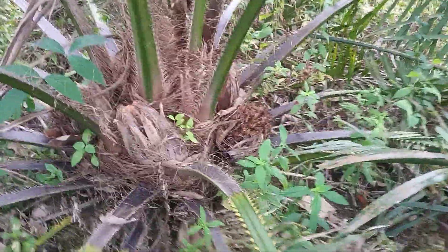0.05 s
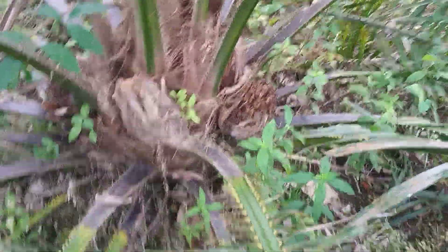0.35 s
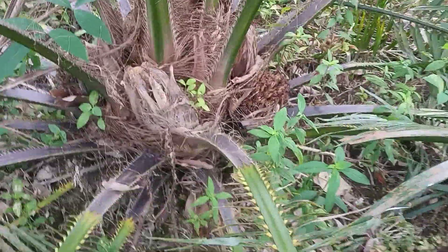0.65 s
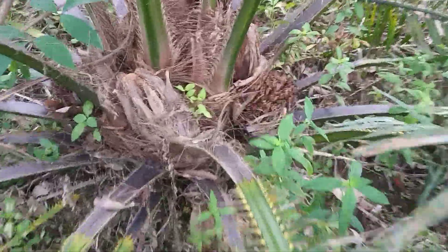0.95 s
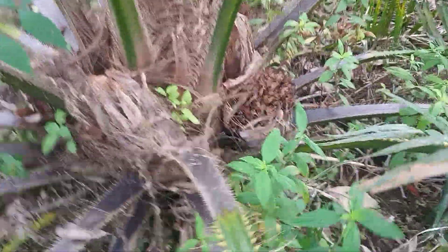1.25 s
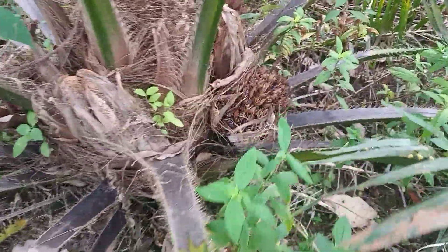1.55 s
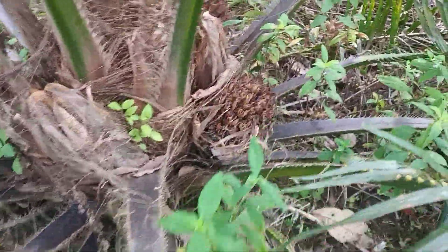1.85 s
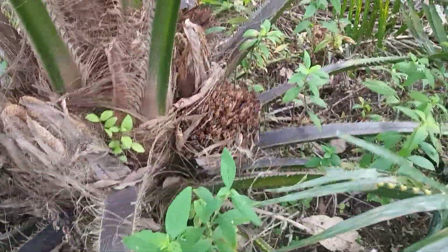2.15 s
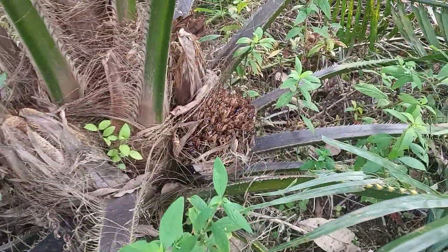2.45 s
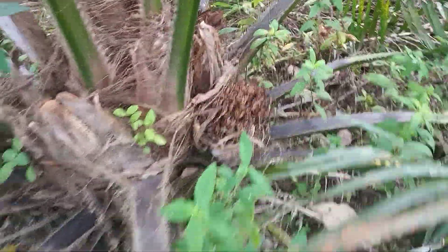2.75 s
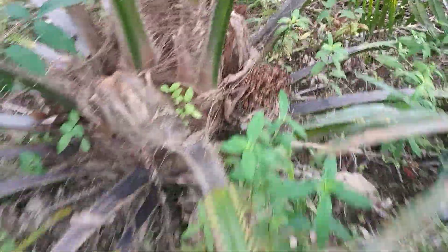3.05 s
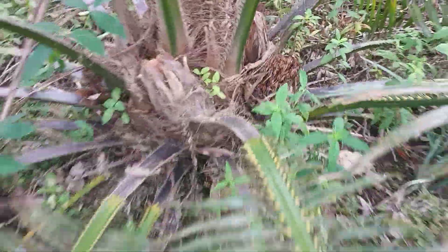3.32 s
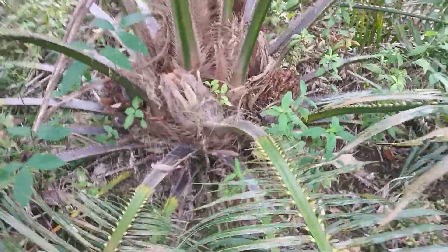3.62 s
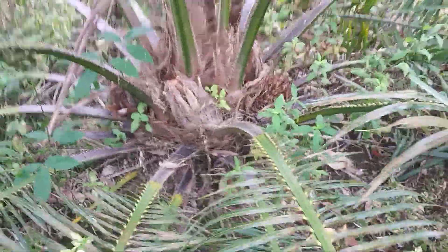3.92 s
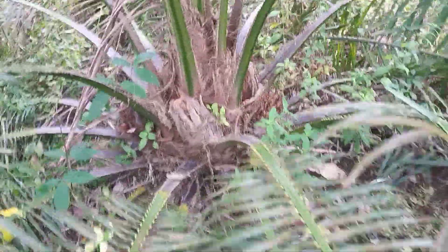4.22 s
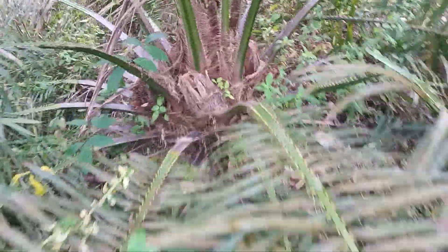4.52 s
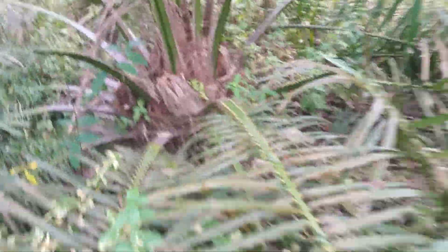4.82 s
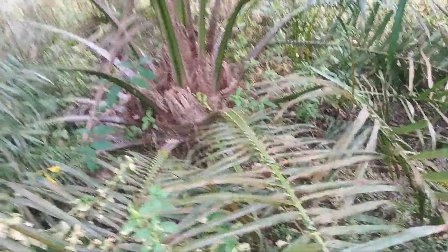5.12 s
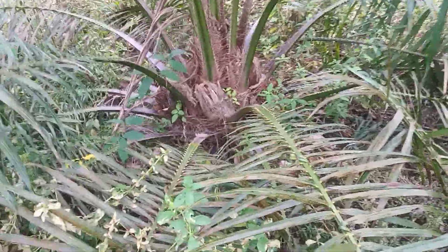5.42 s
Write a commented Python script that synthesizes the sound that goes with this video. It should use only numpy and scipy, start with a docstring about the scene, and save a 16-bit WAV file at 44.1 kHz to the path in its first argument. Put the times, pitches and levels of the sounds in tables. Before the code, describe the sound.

A steady, high insect hiss and a thin chirping cricket surround a person moving through palm undergrowth. Close by, a footstep crushes dry litter with a cluster of snapping twigs, followed by on-and-off rustling of fronds and a second, lighter step. The loudest sounds are a few sharp clicks of leaves hitting the microphone. Near the end a faint hum sets in and something hollow is knocked three times far off.

```python
"""Dead fronds crunch and snap and leaves brush past as someone steps through dry undergrowth among palms.
Stiff leaflet tips flick the camera's case, which makes its limiter duck.
Insects hiss and trill all around, and a cricket chirps with paired wing strokes.
Late on, a low drone sets in and something hollow is knocked three times further off."""
import sys
import numpy as np
from scipy import signal
from scipy.fft import rfft, irfft, next_fast_len
from scipy.io import wavfile
from scipy.ndimage import uniform_filter1d, minimum_filter1d, map_coordinates

SR = 44100
rng = np.random.default_rng(int(sys.argv[2]) if len(sys.argv) > 2 else 0)


def store_wav(level_fs):
    """Save 16-bit WAV to argv[1]."""
    pcm = np.round(np.clip(np.atleast_2d(level_fs), -1, 1) * 32767)
    wavfile.write(sys.argv[1], SR, pcm.T.astype(np.int16))


N = 250047
TIME_S = np.arange(N) / SR


def amp(db):
    """Decibels to gain."""
    return 10 ** (np.asarray(db) / 20)


def unit(x):
    """Scale to rms 1."""
    return x / np.sqrt(np.mean(x ** 2) + 1e-20)


def wobble(rate_hz):
    """Smooth random curve, rate_hz knots a second."""
    return map_coordinates(rng.standard_normal(int(N * rate_hz / SR) + 4), [TIME_S * rate_hz])


def filtered(x, response):
    """Apply a gain given as a function of frequency."""
    size = next_fast_len(len(x) + 4096)
    return irfft(rfft(x, size) * response(np.fft.rfftfreq(size, 1 / SR) + 1), size)[:len(x)]


def coloured(x, spectrum):
    """Shape x by (f/Hz, level/dB) points; rms 1."""
    f, db = np.transpose(spectrum)
    return unit(filtered(x, lambda hz: amp(np.interp(np.log(hz), np.log(f), db))))


def band(count, hz, octaves):
    """Noise in a bell around hz; rms 1."""
    noise = rng.standard_normal(count)
    return unit(filtered(noise, lambda f: np.exp(-.5 * (np.log2(f / hz) / octaves) ** 2)))


def add(track, start_s, sound):
    """Mix a sound into the track."""
    i = max(round(start_s * SR), 0)
    track[i:i + len(sound)] += sound[:max(N - i, 0)]


def resonant(x, depth_db, spacing_hz=170):
    """Impose the random resonances of one leaf or stem; rms 1."""
    heights = rng.standard_normal(1024)
    return unit(filtered(x, lambda hz: amp(depth_db * map_coordinates(heights, [hz / spacing_hz]))))


def patchy(x, depth_db, size):
    """Brief random emphases as leaf after leaf takes the lead; a larger size rings longer, narrower."""
    spectra = signal.stft(x, nperseg=size)[2]
    field = uniform_filter1d(rng.standard_normal(spectra.shape), size=4, axis=0)
    field = uniform_filter1d(field, size=6, axis=1)
    return signal.istft(spectra * amp(depth_db * unit(field)), nperseg=size)[1][:N]


def crackle(per_s, hz, cycles, spread_db, size=256):
    """Tiny fractures, each a damped ring of its own pitch and strength."""
    shape = (int(per_s * N / SR), 1)
    onsets = rng.integers(0, N, shape)
    pitch_hz = np.minimum(hz * np.exp(.5 * rng.standard_normal(shape)), SR / 2)
    strength = amp(spread_db * np.minimum(rng.exponential(size=shape), 4)) * rng.choice([-1, 1], shape)
    turns = pitch_hz * np.arange(size) / SR
    grains = strength * np.sin(2 * np.pi * turns) * np.exp(-turns / cycles)
    return unit(np.bincount((onsets + np.arange(size)).ravel(), grains.ravel(), N)[:N])


# Outdoor air: f/Hz, relative density/dB
AIR_SPECTRUM = [(20, -7), (45, 5), (75, 3), (150, -6), (350, -17), (2000, -26.5), (15000, -29.5)]


def air():
    """Faint, steady outdoor noise, mostly bass."""
    return amp(-79.5) * coloured(rng.standard_normal(N), AIR_SPECTRUM)


def drone(start_s=3.88, hz=55.8, rise_db_per_s=3.5, waver_db=1.5):
    """A low, wavering tone and rumble that set in late and slowly grow."""
    age_s = TIME_S - start_s
    gain = np.clip(age_s / 0.067, 0, 1) * amp(-52 + rise_db_per_s * age_s + waver_db * wobble(12))
    tone = np.sin(2 * np.pi * np.cumsum(hz + 1.71 * wobble(11)) / SR)
    return gain * (tone + 0.21 * band(N, 49.4, 0.58))


# Insect chorus: f/Hz, relative density/dB
CHORUS_SPECTRUM = [(2000, -45), (2650, -32), (3100, -29), (3600, -20.5), (4100, -34.5), (4600, -8),
                   (5900, -4.5), (6900, 1), (7600, -3.5), (8150, 2.5), (8650, -21.5), (10000, -27),
                   (11300, -14.5), (12200, -38), (15500, -36), (17000, -55)]
# Nearer insects: start/s, end/s, f/Hz, level/dB, pulse rate/Hz
TRILLS = [(-.2, 0.92, 4700, -66.5, 28), (-.2, 1.44, 6070, -65, 31), (1.8, 3.4, 5530, -64.5, 42),
          (4.68, 4.92, 4770, -62, 25.5)]


def insects():
    """A massed high hiss; nearer singers come and go as narrow pulsing bands."""
    flutter_db = 0.17 * wobble(2.6) + 1.4 * wobble(90)
    out = amp(-54.5 + flutter_db) * coloured(rng.standard_normal(N), CHORUS_SPECTRUM)
    for start_s, end_s, hz, db, pulse_hz in TRILLS:
        bout = np.clip(np.minimum(TIME_S - start_s, end_s - TIME_S) / 0.037, 0, 1)
        pulses = 1 + .55 * np.sin(2 * np.pi * pulse_hz * TIME_S + 1.3 * wobble(9))
        out += amp(db) * bout * unit(band(N, hz, 110 / hz) * pulses)
    return out


# Runs of double chirps: start/s, end/s, period/s, level/dB
CRICKET_RUNS = [(0.113, .8, 0.19, -50.5), (1.345, 2.42, 0.19, -54), (2.504, 2.88, 0.14, -55),
                (2.937, 4.4, 0.2, -52.5)]


def cricket(stroke_s=.042, jitter_s=.012):
    """Two wing strokes a chirp; the pitch arches with wing speed."""
    out, u = np.zeros(N), np.linspace(0, 1, int(stroke_s * SR))
    speed = np.sin(np.pi * u)
    for start_s, end_s, period_s, db in CRICKET_RUNS:
        for beat_s in np.arange(start_s, end_s, period_s):
            at_s = beat_s + rng.normal(0, jitter_s)
            for stroke in range(2):
                hz = 8120 + 190 * speed - 70 * u + rng.normal(0, 25) + 70 * band(len(u), 150, 0.96)
                tone = np.sin(2 * np.pi * np.cumsum(hz) / SR)
                add(out, at_s + stroke * stroke_s, amp(db + rng.normal(0, 1)) * speed * tone)
    return out


# Blows: t/s, relative level/dB
KNOCK_HITS = [(4.948, -34), (5.019, -31), (5.182, -33)]
# Hollow body: f/Hz, relative level/dB, t60/s
HOLLOW_MODES = [(680, -9.5, .23), (947, -6, .094), (1270, -3, .12), (2290, -10, 0.075)]


def knocks(gain_db=-13.5):
    """Blows on something hollow further off, smeared by the trees."""
    out, t = np.zeros(N), np.arange(SR // 3) / SR
    attack = 1 - np.exp(-t / 0.0012)
    for at_s, db in KNOCK_HITS:
        for hz, mode_db, t60_s in HOLLOW_MODES:
            ring = np.sin(2 * np.pi * hz * rng.normal(1, 0.016) * t) + 0.49 * band(len(t), hz, 0.32)
            add(out, at_s, amp(gain_db + db + mode_db - 60 * t / t60_s) * ring * attack)
    return out


# Single-leaf scuffs: t/s, level/dB, f/Hz, length/s
LEAF_SCUFFS = [(0.301, -65.5, 1520, 0.064), (0.582, -52, 1030, 0.086), (1.292, -58, 1200, 0.079),
               (1.351, -60.5, 1020, 0.09), (1.565, -54.5, 1170, 0.061), (1.744, -57.5, 10000, .03),
               (1.861, -68, 1410, .045), (1.979, -59.5, 1300, 0.05), (2.195, -74.5, 1190, 0.028),
               (3.174, -64.5, 1927, 0.078), (3.341, -66, 1090, 0.053), (3.964, -49, 5440, 0.11),
               (3.999, -63.5, 654, .14), (4.388, -53.5, 4000, 0.13), (4.455, -51, 11600, .025),
               (4.516, -56, 994, 0.062), (4.814, -68.5, 427, 0.07), (5.47, -63, 10000, .055)]


def brushes(peak_share=0.15):
    """A leaf catches quickly, scrapes along and slides off."""
    out, t = np.zeros(N), np.arange(SR // 4) / SR
    for at_s, db, hz, length_s in LEAF_SCUFFS:
        u = t / (peak_share * length_s)
        friction = band(len(t), hz, octaves=0.84) * amp(2 * band(len(t), 150, 1))
        add(out, at_s, amp(db) * u * np.exp(1 - u) * resonant(friction, depth_db=5.5))
    return out


# Damp rings: footfall thumps, knocked twigs and stalks, and the ring of the tip flick at 2.77 s: t/s, level/dB,
# f/Hz
DAMP_RINGS = [(.5684, -22.5, 480), (.7893, -19, 520), (.955, -28.5, 1360), (1.0398, -29, 1200),
              (1.693, -40, 1270), (1.9738, -24, 1800), (2.768, -20, 1100), (2.7715, -11.5, 622),
              (3.686, -27.5, 584), (5.147, -33, 390)]


def damp_rings(t60_at_1khz_s=0.0097):
    """Damp rings last a few cycles, with one weaker overtone."""
    out, t = np.zeros(N), np.arange(SR // 12) / SR
    for at_s, db, hz in DAMP_RINGS:
        t60_s = t60_at_1khz_s / (hz / 1000) ** .15
        ring = np.sin(2 * np.pi * hz * t) + 0.12 * np.sin(2 * np.pi * 1.524 * hz * t)
        attack = (1 - np.exp(-t * hz / .5)) ** 2
        add(out, at_s, amp(db - 60 * t / t60_s) * ring * attack)
    return out


def swing(t, hz):
    """One pressure swing, down then up, with a steep turn at t = 0."""
    phase = 2 * np.pi * hz * t
    return np.tanh(phase / 0.14) * np.exp(-abs(phase) / 1.65) * np.cos(0.4 * phase)


# Leaflet tips on the case: t/s, level/dB, thud f/Hz, rebound share, relative crack level/dB, crack f/Hz
TIP_FLICKS = [(0.0291, -26, 256, 0, 8, 4950), (1.1458, -7.5, 489, 0.08, -5.5, 5360),
              (2.7691, -15, 670, 0, -10, 4144), (2.7715, -3, 704, 0.25, -3.5, 5520),
              (3.7244, -18, 460, 1, -9, 2380), (4.7426, -31.5, 654, 0, 5.5, 2230),
              (5.1752, -30.5, 225, 0.03, -25, 1410), (5.3776, -18, 350, 0.03, -13.5, 2950),
              (5.5314, -6.5, 476, 0.47, -2.5, 5650)]
# Camera case: f/Hz, relative level/dB, t60/s
CASE_MODES = [(103, -30, 0.03), (197, -28.5, 0.038)]


def flicks(rebound_s=.00044):
    """A stiff tip dents the case, lets go and rebounds: a thud, a crack at its turn, a low shudder."""
    out, t = np.zeros(N), np.arange(-SR // 100, SR // 20) / SR
    age_s = np.maximum(t, 0)
    shudder = sum(amp(db - 60 * age_s / t60_s) * np.sin(2 * np.pi * hz * age_s)
                  for hz, db, t60_s in CASE_MODES)
    for at_s, db, thud_hz, rebound, crack_db, crack_hz in TIP_FLICKS:
        thud = swing(t, thud_hz) + rebound * swing(t - rebound_s, thud_hz)
        crack = np.cos(2 * np.pi * crack_hz * t) * np.exp(-abs(t) * crack_hz / 0.36)
        scratch = 0.25 * band(len(t), crack_hz, 0.48) * np.exp(-abs(t) / 0.00073)
        add(out, at_s + t[0], amp(db) * (thud + amp(crack_db) * (crack + scratch) + shudder))
    return out


# Breaking twigs and dry fronds: t/s, level/dB, f/Hz, width/octaves, t60/s
STEM_SNAPS = [(0.559, -47.5, 3000, 0.67, 0.22), (.724, -40.5, 4880, 0.84, 0.13),
              (.767, -29, 5300, 0.61, 0.056), (.815, -25.5, 6640, 1.1, .035), (.871, -25, 6500, .7, 0.033),
              (0.8947, -33, 6460, 1.2, .028), (0.943, -37, 3270, 1.2, 0.034), (1.0398, -38, 1700, .7, .014),
              (1.139, -39, 4050, 1.2, 0.008), (1.3563, -42, 3800, 1.04, 0.048),
              (1.9738, -35.5, 2500, 0.71, 0.021), (2.53, -48, 4040, 0.56, 0.076),
              (3.337, -54, 2130, 0.54, 0.085), (3.84, -36, 11300, 1.58, 0.016),
              (4.186, -46, 4260, 0.8, .12), (4.5332, -38, 3570, 0.92, 0.016), (4.833, -39, 5900, .16, .025),
              (4.871, -48.5, 3120, 0.22, 0.016), (5.1645, -49.5, 1500, 1.1, 0.015)]


def snaps(crack_t60_s=0.0035):
    """A stem cracks at once; its fibres go on tearing briefly."""
    out, t = np.zeros(N), np.arange(SR // 8) / SR
    for at_s, db, hz, octaves, tear_t60_s in STEM_SNAPS:
        envelope = amp(-60 * t / crack_t60_s) + amp(-60 * t / tear_t60_s)
        add(out, at_s, amp(db) * envelope * resonant(band(len(t), hz, octaves), depth_db=2))
    return out


# Fronds pushed aside: start/s, end/s, rustle level/dB, fizz level/dB
FROND_SWEEPS = [(-.05, 0.042, -62, -68), (.3, .72, -60, -62.5), (1.0, 1.516, -58, -60.5),
                (1.71, 2.03, -63, -69.5), (2.5, 2.76, -67.5, -74.5), (3.16, 3.42, -65.5, -67.5),
                (3.74, 4.222, -58, -65), (4.3, 4.978, -62.5, -66.5), (5.548, 5.72, -91, -61.5)]


def sweep_gains(attack_s=0.035, settle_s=0.068, sag_db_per_s=3.5, fizz_lag_s=.04, litter_db=-26.5):
    """Yield (crush, rustle, fizz) gains: a frond is taken up, drags litter, gives way and swings out."""
    for start_s, end_s, rustle_db, fizz_db in FROND_SWEEPS:
        age_s = np.maximum(TIME_S - start_s, 0)
        push = np.minimum(age_s / attack_s, 1) * np.exp(-np.maximum(TIME_S - end_s, 0) / settle_s)
        push *= amp(-sag_db_per_s * (TIME_S - (start_s + end_s) / 2))
        edges = 1 - np.exp(-age_s / fizz_lag_s)
        yield amp(rustle_db + litter_db) * push, amp(rustle_db) * push, amp(fizz_db) * push * edges


# Feet sinking into litter: t/s, length/s, crush level/dB, rustle level/dB, fizz level/dB
FOOTSTEPS = [(.685, 0.42, -47, -40, -47), (3.392, 0.48, -59, -47, -54)]


def step_gains(skew=0.79):
    """Yield (crush, rustle, fizz) gains: a foot's load comes on faster than it goes off."""
    for start_s, length_s, crush_db, rustle_db, fizz_db in FOOTSTEPS:
        progress = np.clip((TIME_S - start_s) / length_s, 0, 1)
        load = abs(np.sin(np.pi * progress ** skew))
        yield amp(crush_db) * load ** 1.18, amp(rustle_db) * load ** 1.07, amp(fizz_db) * load


# Crushed litter: f/Hz, relative level/dB
CRUSH_EQ = [(100, -39.5), (250, -14.5), (550, 0), (1200, 4), (2000, -0.5), (4000, -32.5)]
# Sliding fronds: f/Hz, relative level/dB
RUSTLE_EQ = [(700, -43.5), (1400, -15.5), (2300, -3), (3300, 0), (4300, -3.5), (5400, 2), (6500, 4),
             (8500, -8), (11000, -16), (16000, -29.5)]
# Dry edges: f/Hz, relative level/dB
FIZZ_EQ = [(3000, -24.5), (6500, -3.5), (9000, 1), (12000, -1), (15000, -3.5), (16500, -8.5)]


def leaves(idle_rustle_db=-82, idle_fizz_db=-82.5):
    """Litter is crushed underfoot; fronds slide over each other and their dry edges fizz and tick."""
    gains = np.array([[0], [amp(idle_rustle_db)], [amp(idle_fizz_db)]])
    for movement in (*step_gains(), *sweep_gains()):
        gains = np.hypot(gains, movement)  # powers add
    crush_gain, rustle_gain, fizz_gain = gains
    crushing = crackle(900, 1000, cycles=2.8, spread_db=4.5) + 1.9 * rng.standard_normal(N)
    sliding = crackle(1000, 3800, cycles=0.65, spread_db=0) + 1.5 * rng.standard_normal(N)
    rustle = coloured(patchy(patchy(sliding, 2, size=256), 2, size=1024), RUSTLE_EQ)
    crush = unit(patchy(coloured(crushing, CRUSH_EQ), 1.8, size=1024))
    fizz = coloured(crackle(1300, 9200, cycles=2.1, spread_db=0.5) + .9 * rng.standard_normal(N), FIZZ_EQ)
    ticks = coloured(crackle(55, 4500, cycles=3, spread_db=3), RUSTLE_EQ)
    crinkles = np.minimum(rustle_gain * amp(-5), amp(-58.5)) * ticks  # capped: heavy rustle drowns them
    stick_slip = amp(1.8 * wobble(45) + 1.2 * wobble(14))
    return crinkles + stick_slip * (crush_gain * crush + rustle_gain * rustle + fizz_gain * fizz)


def scene():
    """Undergrowth and surroundings at one microphone."""
    undergrowth = leaves() + brushes() + snaps() + damp_rings() + flicks()
    return (undergrowth + knocks() + insects() + drone() + air() + cricket())[None]


def record(dry):
    """A limiter catches the flicks, holds and recovers; then a low cut and a band limit."""
    threshold, hold_s, release_s = 0.24, 0.032, 0.029
    low_cut_hz, top_hz = 75, 15900
    needed_db = -20 * np.log10(np.maximum(abs(dry[0]) / threshold, 1))
    hold = int(hold_s * SR)
    held_db = minimum_filter1d(needed_db, hold, origin=(hold - 1) // 2)
    pole = np.exp(-1 / (release_s * SR))
    gain_db = np.minimum(held_db, signal.lfilter([1 - pole], [1, -pole], held_db))
    gain_db = uniform_filter1d(minimum_filter1d(gain_db, size=221), size=221)  # look-ahead
    low_cut = signal.butter(2, low_cut_hz, "high", fs=SR, output="sos")
    limited = signal.sosfilt(low_cut, dry[0] * amp(gain_db))
    return filtered(limited, lambda hz: 1 / (1 + (hz / top_hz) ** 120))[None]


dry = scene()
out = record(dry)
store_wav(out)
```